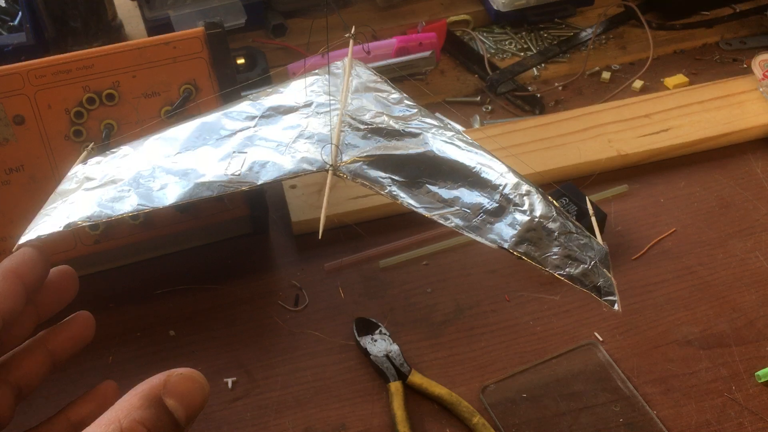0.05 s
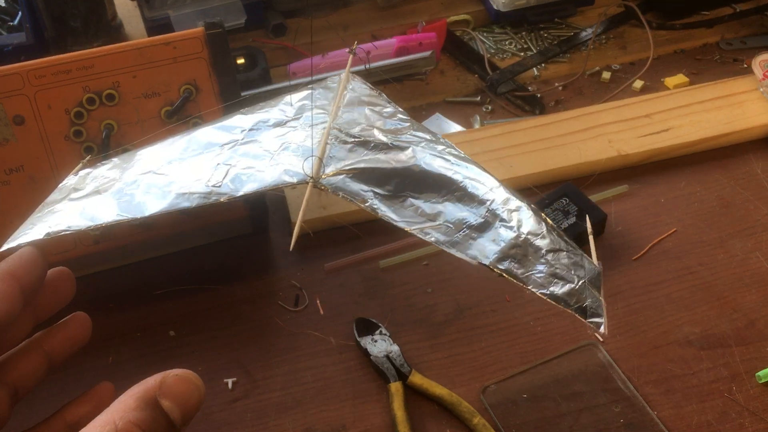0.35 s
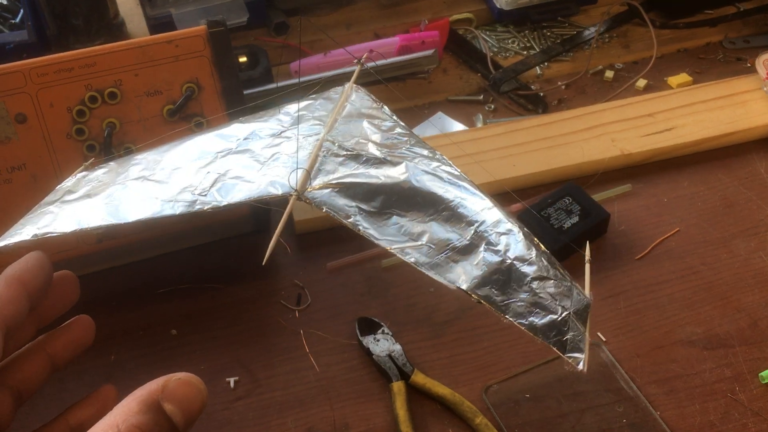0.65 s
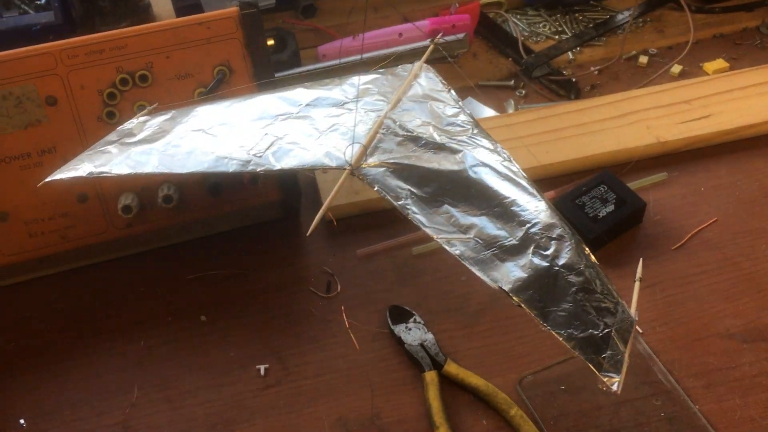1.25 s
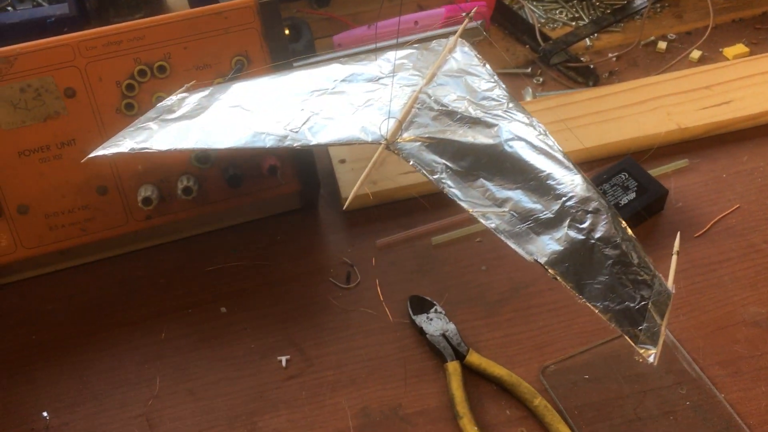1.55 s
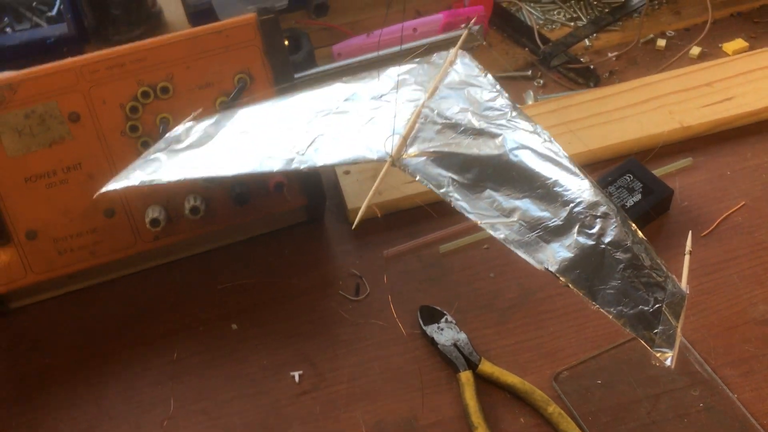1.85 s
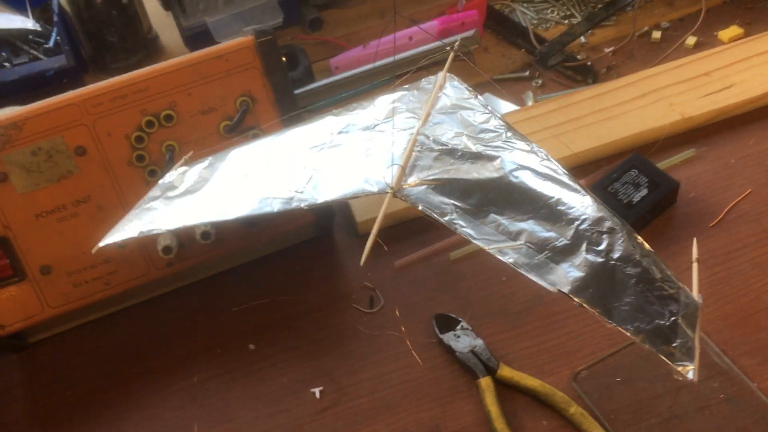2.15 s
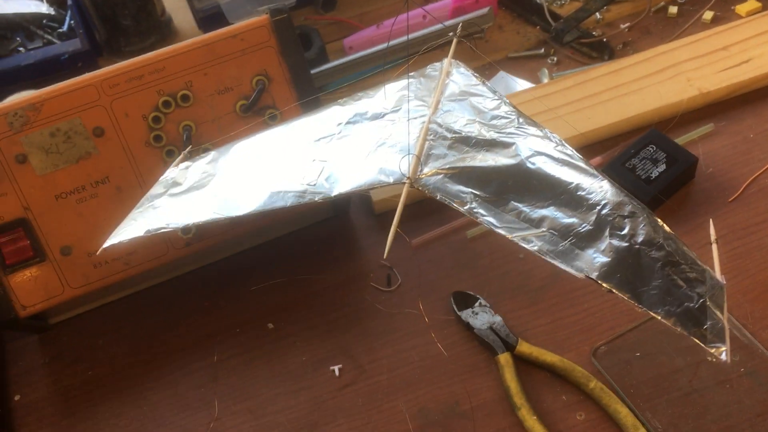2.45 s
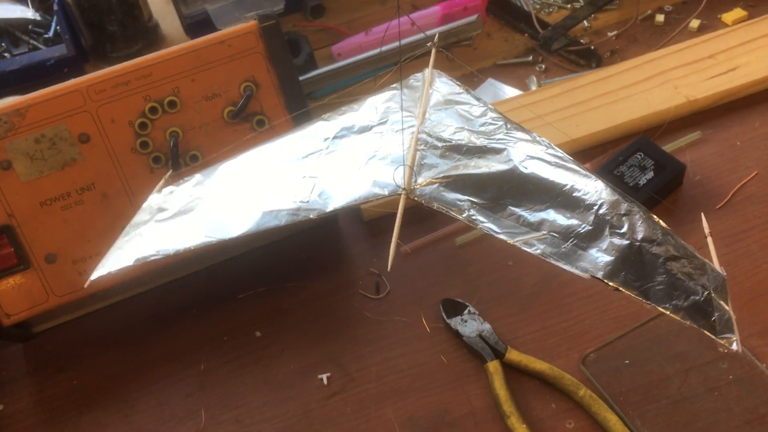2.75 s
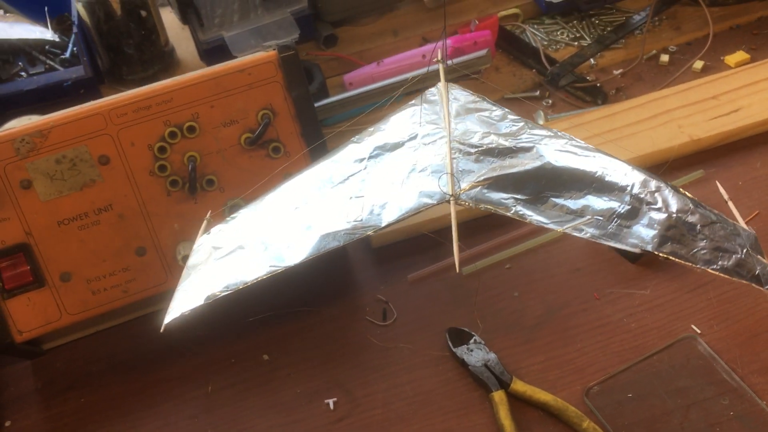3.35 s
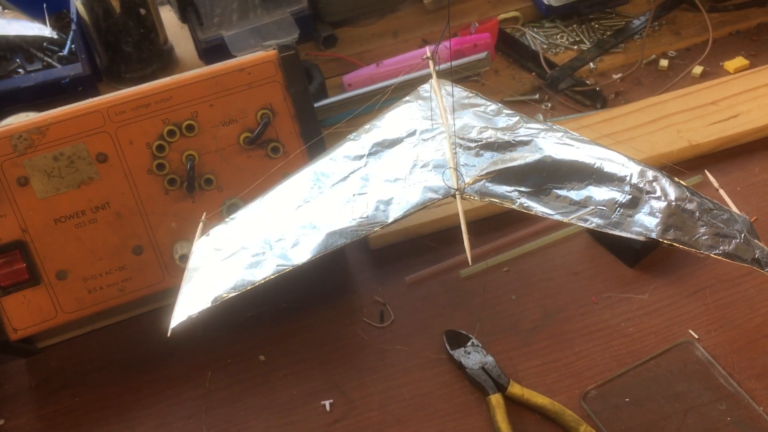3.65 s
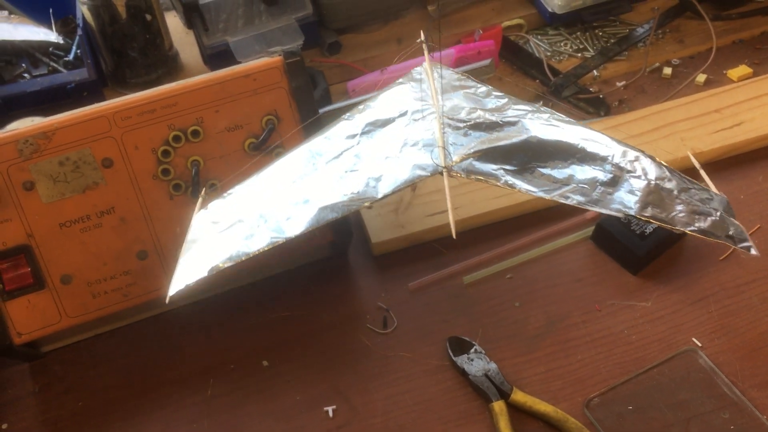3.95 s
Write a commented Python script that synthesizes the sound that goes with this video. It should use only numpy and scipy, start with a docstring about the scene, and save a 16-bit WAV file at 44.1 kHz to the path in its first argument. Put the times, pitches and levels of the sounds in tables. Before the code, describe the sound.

A sharp switch snap, then a high electrical hiss with a thin whine.

```python
"""Switching on a high-voltage supply

A supply on a workbench is switched on to drive a foil wing. First come mains hum, faint rustles
and soft handling knocks in a small room. Then the switch ticks and snaps with a bright, brief ring.
Tiny electric discharges into the air (corona) make a hiss that swells as the voltage builds,
joined by a thin whine from the converter and a buzz from the transformer."""
import sys
import numpy as np
from scipy import signal
from scipy.fft import rfft, irfft
from scipy.io import wavfile
from scipy.ndimage import uniform_filter1d

SR = 44100
rng = np.random.default_rng(int(sys.argv[2]) if len(sys.argv) > 2 else 0)


def transcribe(u):
    """Save the signal u as a 16-bit wav file named by the first command-line argument.

    u: samples, shape (n,) or (channels, n), limited to [-1, 1]; the rate is SR.
    q: integer samples, one column per channel.
    """
    v = np.clip(np.atleast_2d(u).T, -1, 1)
    q = np.round(v * 32767).astype(np.int16)
    wavfile.write(sys.argv[1], SR, q)


N = 176400
TIME = np.arange(N) / SR
HIT_TIME = np.arange(SR // 2) / SR  # each hit gets half a second
HISS_TOP_HZ = 15750
SNAP_RISE_S, KNOCK_RISE_S = 0.0004029, 0.0003592
# Throughout, fade_s is the time a sound takes to fall by 60 dB.


def high_voltage():
    """Once on, tiny discharges merge into a hiss, the converter whines and the transformer buzzes."""
    # tone colour of the corona hiss: pitch_hz, level_db
    hiss_colour = [(400, -29), (800, -28.5), (1700, -27), (2600, -22), (3900, -22.5), (4350, -18),
                   (4900, -23), (5350, -15), (6500, -12), (7600, -12.5), (8700, -6), (9800, -6),
                   (10300, -6), (11700, -1.5), (12900, 0.5), (14200, -2.5), (15700, -8)]
    # swell of the hiss: time_s, level_db
    hiss_swell = [(3.6, -59.5), (3.66, -43.5), (3.72, -44), (3.78, -43.5), (3.82, -40.5), (3.92, -41),
                  (4.0, -40.5)]
    # the whine dips and comes back: time_s, level_db
    whine_levels = [(3.62, -47.5), (3.7, -54.5), (3.78, -68.5), (3.86, -64), (3.92, -51.5), (4.0, -49)]
    # tones of the transformer under load: pitch_hz, level_db
    buzz_tones = [(300, -77.5), (400, -74), (451, -74.5), (500, -83.5), (600, -82.5), (700, -86.5)]
    on_s, rise_s, flutter_db = 3.6, 0.02797, 0.261
    whine_hz, wander_hz = 9926, 7.828
    power = np.clip((TIME - on_s) / rise_s, 0, 1)
    hiss_db = curve(hiss_swell) + flutter_db * drift(150)
    hiss = gain(hiss_db) * noise(hiss_colour, N, HISS_TOP_HZ)
    cycles = np.cumsum(whine_hz + wander_hz * drift(40)) / SR
    whine = np.sqrt(2) * gain(curve(whine_levels)) * np.sin(2 * np.pi * cycles)
    return power * (hiss + whine + hum(buzz_tones))


def switch():
    """Each contact cracks with a bright, brief ring, jolts the box and echoes in the room."""
    # contacts inside the switch: start_s, level_db, cutoff_hz, crack_db (compared with the ring)
    contacts = [(3.5683, -61.5, 14970, 1), (3.5705, -40.5, 4706, 7), (3.5924, -14, 18980, -3)]
    # tone colour of the snap: pitch_hz, level_db
    snap_colour = [(60, -28.5), (200, -15), (330, -16), (470, -26), (590, -8.5), (690, -19.5), (920, -8.5),
                   (1120, -25.5), (1550, -16.5), (1800, -25), (2150, -6), (3200, -4), (3900, -6.5),
                   (4800, -13.5), (5400, -4.5), (6600, 0.5), (7800, -6), (8900, 0.5), (10300, -10.5),
                   (11400, 2), (12700, -4.5), (14000, -11.5), (15600, -10.5), (16800, -33.5)]
    # tones of the snap's bright, brief ring: pitch_hz, level_db, fade_s
    snap_tones = [(2172.3, -7.5, 0.1204), (3170, -7, 0.11065), (3268, -1.5, 0.0427), (3892.2, 7.5, 0.04276),
                  (5418.6, -3, 0.1192), (6139.3, 7, 0.0972), (6209.2, -8, 0.186), (6660, -8.5, 0.1436),
                  (6459, -10.5, 0.0847), (7004, -0.5, 0.1013), (6930, -1, 0.1082), (8830, -7, 0.0561),
                  (9059.3, 11.5, 0.0294), (11040, -3.5, 0.0575), (11740, -4, 0.0677)]
    # low thump of the whole box on the bench: pitch_hz, level_db, fade_s
    thump_tones = [(59.38, -33, 0.613), (119.93, -38.5, 0.2963), (173.08, -33, 0.233)]
    ring = hit_shape(SNAP_RISE_S, fade_s=0.076736)
    crack = hit_shape(SNAP_RISE_S, fade_s=0.012663)
    out = np.zeros(N)
    for start_s, level_db, cutoff_hz, crack_db in contacts:
        hit = dense_ring(snap_colour, ring + gain(crack_db) * crack)
        hit += gain(-8.5) * clear_ring(snap_tones)
        hit += gain(-10.5) * room_echo(snap_colour)
        hit += fading_tones(thump_tones) * fade_in(rise_s=0.005)
        add(out, start_s, gain(level_db) * soften(hit, cutoff_hz))
    return out


def handling():
    """Handling sends light wooden knocks and low bumps through the bench."""
    # knocks on the bench: start_s, level_db, cutoff_hz
    knocks = [(1.759, -61.5, 448.8), (1.881, -56, 985), (2.2588, -49.5, 2914), (2.338, -55, 2599),
              (2.668, -66, 989.7), (2.986, -64, 496.9)]
    # tone colour of the bench: pitch_hz, level_db
    bench_colour = [(100, -4.5), (290, 3), (400, 0), (490, -6.5), (580, 2.5), (690, -13.5), (880, -3.5),
                    (1250, -6), (1500, -14), (1750, -16), (2200, -18.5), (3300, -15.5), (3900, -43),
                    (8000, -53)]
    # its strongest ringing tones: pitch_hz, level_db, fade_s
    bench_tones = [(276.79, -3, 0.0686), (361.56, -10.5, 0.1168), (573.07, -0.5, 0.0863),
                   (899.56, -4, 0.0863), (992.1, 1.5, 0.05822), (1251.7, -3.5, 0.0313),
                   (1497.7, -10, 0.1412), (2162.8, -16, 0.114), (2413.5, -15.5, 0.0855), (3348.7, -20, .3)]
    # dull bumps: start_s, level_db
    bumps = [(1.774, -60), (2.014, -50.5), (2.045, -58.5), (2.25, -60.5), (2.709, -58)]
    # tone colour of a bump: pitch_hz, level_db
    bump_colour = [(25, -10.5), (60, 13.5), (110, 2), (230, -0.5), (400, -15.5), (600, -33), (1500, -48.5),
                   (6000, -52.5)]
    ring = hit_shape(KNOCK_RISE_S, fade_s=0.1654)
    tap = gain(11) * hit_shape(KNOCK_RISE_S, fade_s=0.007474)
    out = np.zeros(N)
    for start_s, level_db, cutoff_hz in knocks:
        knock = dense_ring(bench_colour, ring + tap) + gain(-0.5) * clear_ring(bench_tones)
        add(out, start_s, gain(level_db) * soften(knock, cutoff_hz))
    for start_s, level_db in bumps:
        bump = dense_ring(bump_colour, hit_shape(rise_s=0.001544, fade_s=0.2269))
        add(out, start_s, gain(level_db) * bump)
    return out


def rustles():
    """Each faint, high rustle is a mass of tiny slips that swells and fades."""
    # rustles: start_s, length_s, level_db
    events = [(1.661, 0.07335, -72), (1.76, 0.06946, -79.5), (1.86, 0.05995, -78.5), (2.042, 0.0677, -77)]
    # tone colour of a rustle: pitch_hz, level_db
    colour = [(1000, -18), (3300, -8.5), (4800, -13), (5800, -2), (6500, -7), (7100, 1), (7800, -7),
              (8800, 2), (10300, -10), (14000, -10.5), (15700, -16)]
    out = np.zeros(N)
    for start_s, length_s, level_db in events:
        size = round(length_s * SR)
        slips = normalise(uniform_filter1d(rng.exponential(1, size) ** 2, size=40))
        swell = signal.windows.tukey(size, .5)
        add(out, start_s, gain(level_db) * swell * slips * noise(colour, size, HISS_TOP_HZ))
    return out


def light_tick():
    """One faint tick that rings very briefly."""
    # tone colour of the tick: pitch_hz, level_db
    colour = [(500, -20.5), (2200, -14.5), (3100, -3.5), (4200, -4), (5000, -17), (12000, -28)]
    tick = dense_ring(colour, hit_shape(KNOCK_RISE_S, fade_s=0.05096))
    out = np.zeros(N)
    add(out, start_s=1.323, sound=gain(-69) * tick)
    return out


def room_echo(colour):
    """The room blurs a hit into a tail of noise whose treble dies first."""
    # how long the room rings: pitch_hz, fade_s
    fade_times = [(100, 0.3592), (700, 0.269), (2500, 0.2326), (6500, 0.1923), (12000, 0.1362)]
    hz, seconds, spectrum = signal.stft(noise(colour, len(HIT_TIME)), SR, nperseg=256)
    fade = gain(-60 * seconds / at_pitch(fade_times, hz)[:, None])
    _, tail = signal.istft(spectrum * fade, SR, nperseg=256)
    return tail[:len(HIT_TIME)] * fade_in(rise_s=0.00374)


def workshop():
    """Steady room noise and the hum of mains electricity."""
    # tone colour of the room noise: pitch_hz, level_db
    colour = [(25, -25.5), (50, 0), (70, -4), (100, -5.5), (130, -6.5), (175, -18), (215, -10.5),
              (300, -14.5), (470, -22.5), (1040, -25), (1550, -30.5), (3000, -30.5), (4300, -32.5),
              (4950, -36.5), (5500, -31.5), (6800, -31.5), (7900, -34), (9300, -29.5), (10500, -33.5),
              (11000, -31), (11220, -25.5), (11500, -29), (15600, -31)]
    # mains hum: pitch_hz, level_db
    mains_tones = [(99.8, -67), (199.9, -68)]
    return gain(-66.5) * noise(colour, N, HISS_TOP_HZ) + hum(mains_tones)


def hum(tones, waver=0.3):
    """Electrical tones that waver in loudness and slightly in pitch."""
    out = np.zeros(N)
    for hz, level_db in tones:
        strength = np.sqrt(2) * gain(level_db) * (1 + waver * drift(4.9))
        phase = 2 * np.pi * (hz * TIME + rng.random()) + waver * drift(2.6)
        out += strength * np.sin(phase)
    return out


def dense_ring(colour, shape):
    """Countless close tones struck at once: a dying burst of noise with a given tone colour."""
    size = len(HIT_TIME)
    burst = rfft(rng.standard_normal(size) * shape)
    burst /= np.sqrt(uniform_filter1d(abs(burst) ** 2, size=120) + 1e-12)  # even out chance peaks
    log_gain = np.log(gain(at_pitch(colour, abs(np.fft.fftfreq(size, 1 / SR)))))
    # a filter that rings only after the strike (minimum phase)
    resonance = np.exp(np.conj(signal.hilbert(log_gain)))[:len(burst)]
    ring = normalise(irfft(burst * resonance, size))
    end_fade = np.minimum((HIT_TIME[-1] - HIT_TIME) * 10, 1) ** 2
    return ring * np.sqrt(np.mean(shape ** 2)) * end_fade


def clear_ring(tones):
    """A hit's strongest tones, scaled by the strength of their first 5 ms."""
    ring = fading_tones(tones)
    return ring / np.std(ring[:SR // 200]) * fade_in(SNAP_RISE_S)


def fading_tones(tones):
    """Pure tones, each dying away at its own rate."""
    return sum(gain(db - 60 * HIT_TIME / fade_s) * np.sin(2 * np.pi * (hz * HIT_TIME + rng.random()))
               for hz, db, fade_s in tones)


def soften(sound, cutoff_hz):
    """A softer contact makes less treble above the cutoff."""
    return signal.sosfilt(signal.butter(2, cutoff_hz, fs=SR, output="sos"), sound)


def hit_shape(rise_s, fade_s):
    """The loudness of a hit: a quick rise, then a fade."""
    return fade_in(rise_s) * gain(-60 * HIT_TIME / fade_s)


def fade_in(rise_s):
    """A smooth climb from 0 towards 1 at the start of a hit."""
    return 1 - np.exp(-HIT_TIME / rise_s)


def noise(colour, size, top_hz=SR):
    """Noise with a given tone colour, between 20 Hz and top_hz."""
    hz = np.fft.rfftfreq(size, 1 / SR)
    spectrum = rfft(rng.standard_normal(size)) * gain(at_pitch(colour, hz))
    return normalise(irfft(spectrum * (hz > 20) * (hz < top_hz), size))


def drift(rate_hz):
    """A smooth random wobble; a higher rate moves faster."""
    hz = np.fft.rfftfreq(N, 1 / SR)
    return normalise(irfft(rfft(rng.standard_normal(N)) * np.exp(-(hz / rate_hz) ** 2), N))


def at_pitch(points, hz):
    """Reads between a table's rows on a musical (logarithmic) pitch scale."""
    pitches, values = np.transpose(points)
    return np.interp(np.log(hz + 1), np.log(pitches + 1), values)


def curve(points):
    """Joins a table's points over time with straight lines."""
    return np.interp(TIME, *np.transpose(points))


def add(mix, start_s, sound):
    """Mixes a sound in at its start time."""
    part = mix[round(start_s * SR):][:len(sound)]
    part += sound[:len(part)]


def gain(db):
    """Turns decibels into a multiplier."""
    return 10 ** (np.asarray(db) / 20)


def normalise(sound):
    """Scales a sound to an average strength (rms) of 1."""
    return sound / np.sqrt(np.mean(sound ** 2) + 1e-20)


def scene():
    """One close microphone feeds both channels."""
    mix = workshop() + handling() + rustles() + light_tick() + switch() + high_voltage()
    return np.tile(mix, (2, 1))


def record(dry):
    """Cuts away the very highest treble."""
    cutoff_hz = 16500
    treble_cut = signal.firwin(255, cutoff_hz, window=("kaiser", 9), fs=SR)
    return signal.oaconvolve(dry, treble_cut[None], "same")


dry = scene()
out = record(dry)
transcribe(out)
```